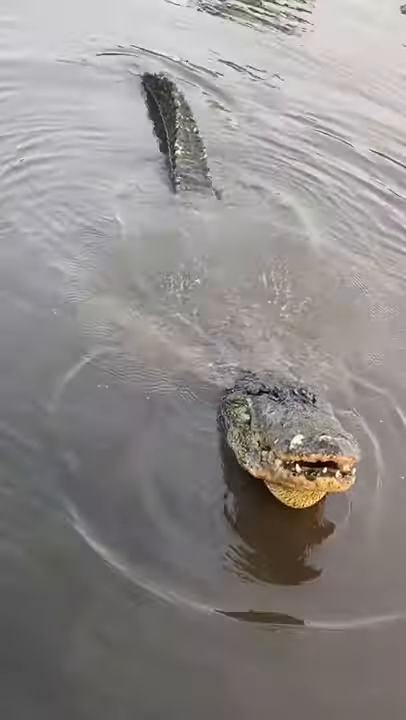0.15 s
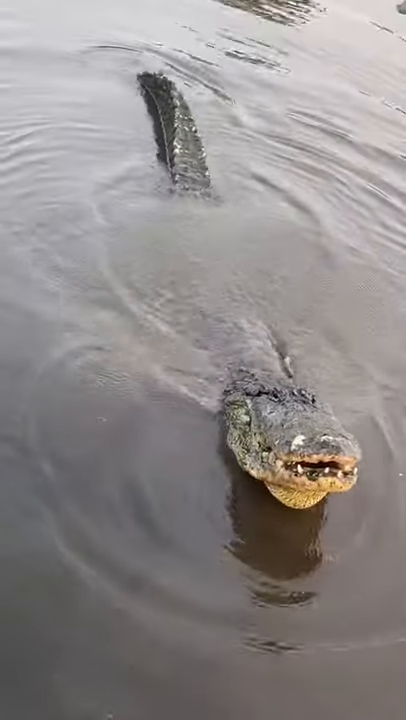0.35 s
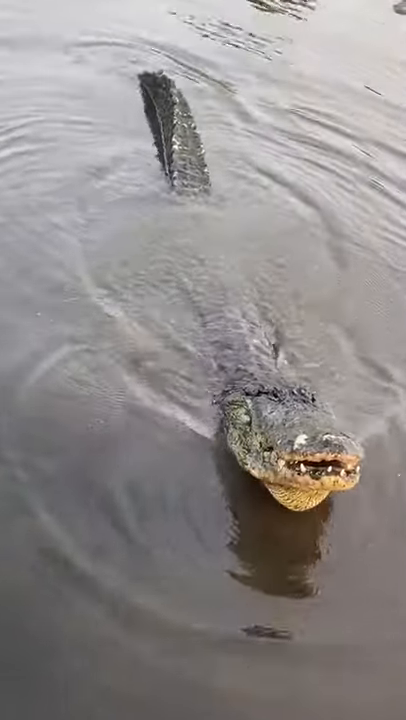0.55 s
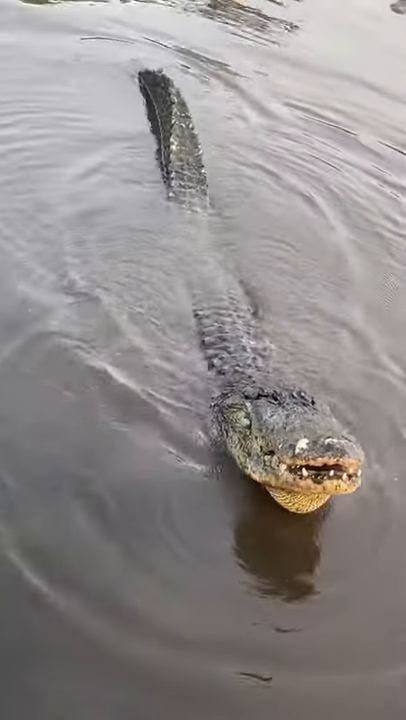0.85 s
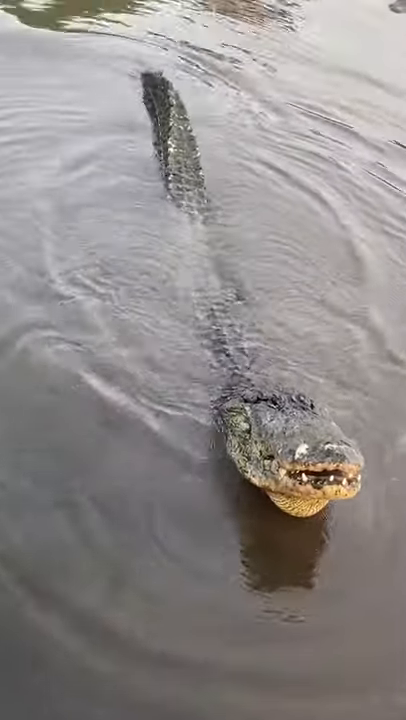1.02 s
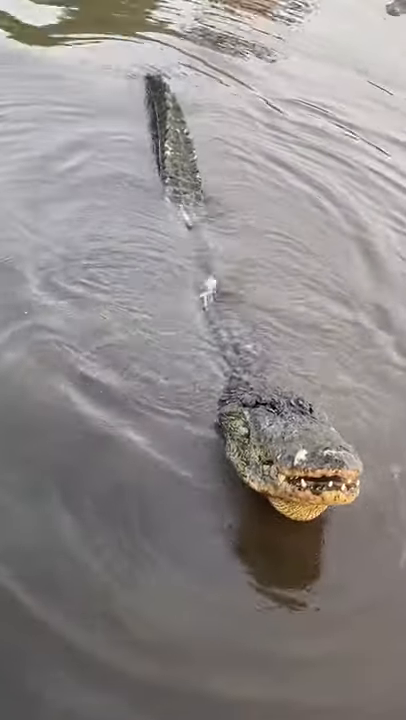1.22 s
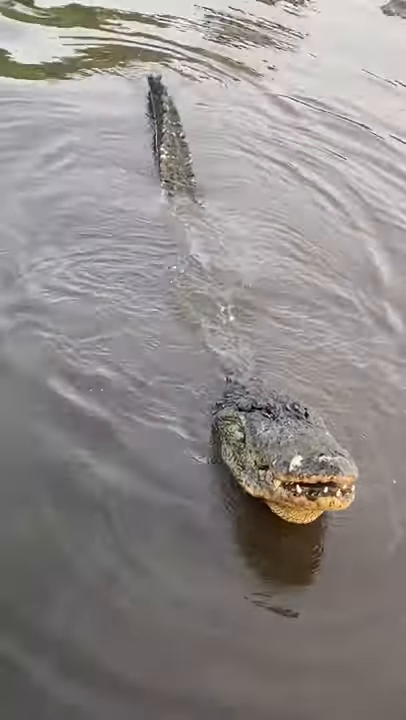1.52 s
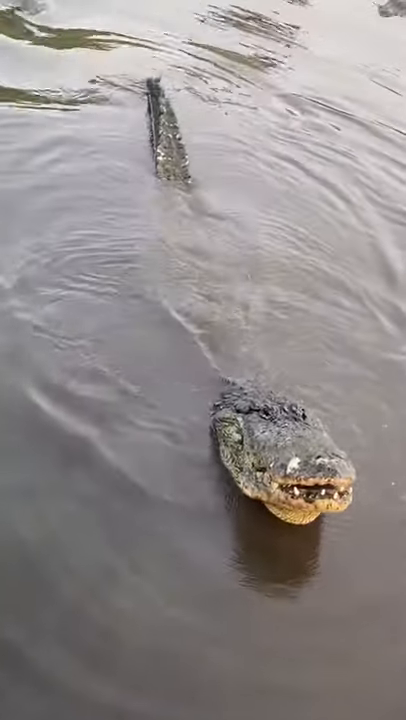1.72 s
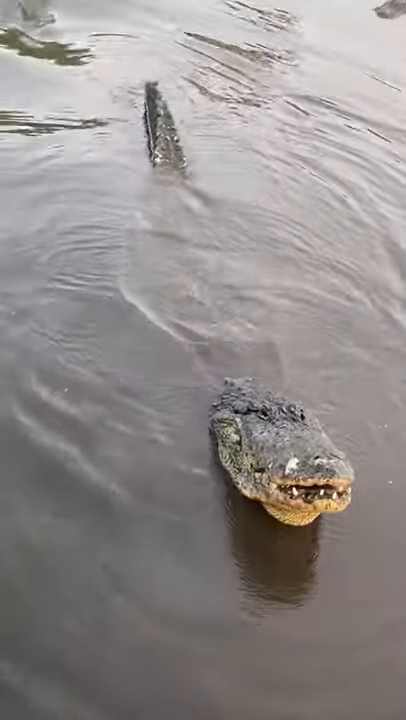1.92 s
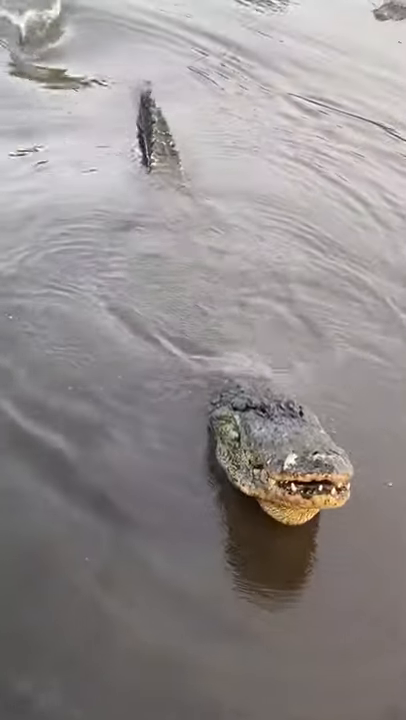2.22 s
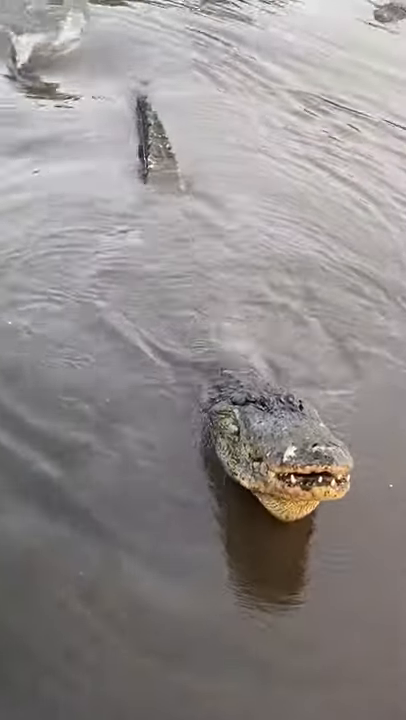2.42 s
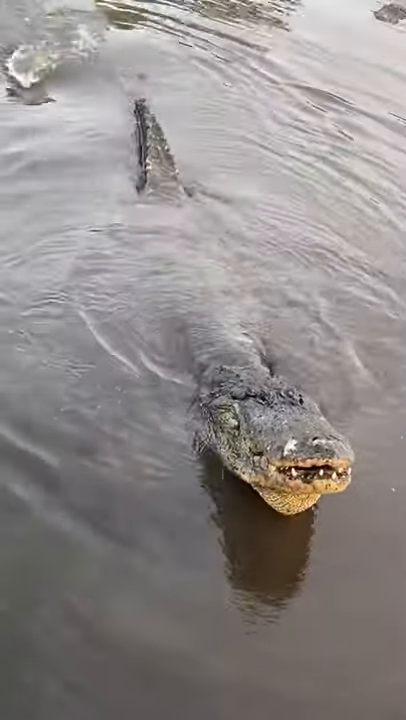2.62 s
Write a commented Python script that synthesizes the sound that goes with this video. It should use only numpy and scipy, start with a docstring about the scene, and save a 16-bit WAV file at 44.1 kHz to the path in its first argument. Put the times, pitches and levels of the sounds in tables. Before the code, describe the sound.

An alligator bellows close by, a deep throbbing growl with wet rasp, ending in separate grunts

```python
"""Alligator bellow in a pond

A bellow close by: two vocal folds flap at different rates and beat in a throb that first quickens, then slows.
The flaps ring chest, body and throat and chop a wet rasp of bubbles and hiss. Separate grunts, each a decaying
ring and a puff, open and close the bellow, and one falls within it; spurts and gurgles wet it, and soft sine
hums and a tremor sit below. Behind lie a faint centred echo from the banks, with fainter opposite-sign noise
tails left and right, a low outdoor rumble and the fine hiss of disturbed water.
"""
import sys
import numpy as np
from scipy import signal
from scipy.fft import rfft, irfft
from scipy.io import wavfile
from scipy.ndimage import uniform_filter1d, minimum_filter1d

SR = 44100
rng = np.random.default_rng(int(sys.argv[2]) if len(sys.argv) > 2 else 0)


def file_out(sig):
    """Save sig as 16-bit WAV at sys.argv[1]."""
    # one column per channel
    cols = np.atleast_2d(sig).T
    # limit, then scale
    lim = np.clip(cols, -1, 1)
    pcm = np.round(lim * 32767).astype(np.int16)
    wavfile.write(sys.argv[1], SR, pcm)


N = 121275
T = np.arange(N) / SR

# Fold motion: (time [s], rate of the slow fold [Hz], throb rate [Hz]); the fast fold runs at their sum
FOLDS = [(0.27, 55.99, 16.77), (0.42, 55.01, 17.75), (0.58, 55.65, 21.06), (0.74, 54.08, 20.12),
         (0.9, 53.56, 17.43), (1.1, 51.71, 16.63), (1.3, 49.15, 15.62), (1.5, 47.81, 16.11),
         (1.66, 47.4, 15.82)]
# Layers of the bellow: (time [s], chest [dB], body [dB], upper body [dB], throat [dB], rasp [dB])
LEVELS = [(.3, -12.5, -14, -23.5, -32, -33.5), (.42, -11, -10.5, -10, -21, -23.5),
          (.6, -11, -11, -19, -27.5, -24), (.85, -10, -7.5, -14.5, -22.5, -24),
          (1.1, -11.5, -11.5, -14, -28, -27), (1.3, -11, -11, -21.5, -26, -26.5),
          (1.46, -9.5, -7, -22.5, -31.5, -29), (1.52, -17, -7, -36, -20.5, -29),
          (1.548, -25, -23, -14, -33, -31.5), (1.58, -18, -5.5, -21.5, -27, -27),
          (1.64, -18, -21, -36, -34.5, -33.5)]
# Posture: (time [s], body resonance [Hz], first throat resonance [Hz], share of the fast fold [0-1])
POSTURE = [(.3, 118, 789.5, 0.1), (.65, 104, 794, 0.54), (.92, 107, 797, 0.05), (1.1, 130.5, 813, 0.95),
           (1.35, 121, 843, 0.53), (1.52, 135, 864, 0.45), (1.75, 129, 822, 0.7)]
# Exponent that narrows the throb: (at the start [1], at the end [1])
THROB_SHARPNESS = [1.1, 7.1]
# Upper body resonances: (frequency [Hz], width of one filter stage [Hz], balance [dB])
UPPER_BODY = [(253.1, 74, 3.5), (302.8, 68, 0), (335.6, 26, -2.5)]
# Throat resonances before posture and waver: (frequency [Hz], width of one filter stage [Hz], balance [dB])
THROAT = [(815, 37, 8), (855, 77, -2.5), (971, 110, -9.5), (1198, 38.7, 2), (1498, 132, -10),
          (1649, 35, -13.5)]
# Relative colour of the rasp: (frequency [Hz], spectrum level [dB per Hz])
RASP_COLOUR = [(1000, -39), (1600, 6), (1750, -18), (1880, 3.5), (2060, -3), (2320, 2), (3560, 0.5),
               (3970, 2.5), (4980, -4), (5820, -5), (6730, -12.5), (9010, -9), (12600, -23), (13700, -45)]
# Grunts, levels before GRUNT_TRIM: (time [s], body [Hz], upper body [Hz],
# chest [dB], body [dB], upper body [dB], throat [dB], rasp [dB])
GRUNTS = [(0.187, 123, 323, -38, -31, -23.5, -32, -42), (0.211, 123, 284, -33, -18.5, -8, -28, -30),
          (0.237, 109, 276, -23, -8, -5.5, -14.5, -22), (0.262, 155, 280, -18, -12, -5, -12, -25.5),
          (0.277, 144, 294.6, -24, -9.5, -3.5, -21, -30), (0.321, 126.4, 360, -37, -4.5, -10, -12.5, -15),
          (0.553, 158, 266.6, -18, -11, -4.5, -21.5, -43), (1.664, 134, 330, -25, -6, -12, -17.5, -27),
          (1.679, 170.4, 290, -17, -8.5, -23, -21, -27), (1.704, 159, 295, -9, -9, -29, -24.5, -26.5),
          (1.73, 148, 245, -27, -18, -10.5, -27, -28.5), (1.795, 157, 322, -2, -6.5, -16, -23, -28),
          (1.815, 165, 266.5, -10, -20, -9.5, -20.5, -29.5), (1.89, 136, 265, -12, -5.5, -23.5, -29, -29.5),
          (1.909, 172, 273, -16, -11.5, -10.5, -25, -38), (1.946, 147, 278, -12, -21, -41, -38, -34),
          (1.983, 130, 338, -10, -8.5, -18, -34, -28), (2.005, 170, 266, -30, -8.5, -26, -26.5, -35),
          (2.044, 162, 271, -26, -32, -8.5, -33.5, -36.5), (2.085, 139, 337, 1, -10, -23, -33, -34),
          (2.114, 165.5, 250, -33, -10.5, -11, -30.5, -36.5), (2.148, 161, 256, -31, -36, -14.5, -36, -38),
          (2.195, 132, 316, -1, -13, -14.5, -40, -35.5), (2.227, 190, 230, -31, -15.5, -23, -35, -38.5),
          (2.272, 144, 287, 0.5, -12.5, -20, -35, -36), (2.312, 132.3, 256, -20, -16, -18, -46, -35),
          (2.359, 180, 277, -17, -12.5, -22, -33, -34.5), (2.402, 183, 255, -6, -18, -23.5, -37, -36.5),
          (2.444, 149, 297, -10.5, -21.5, -28.5, -37, -40)]
# Level added to every grunt: (chest [dB], body [dB], upper body [dB], throat [dB], rasp [dB])
GRUNT_TRIM = [-6.5, 5.5, 1, -0.5, 3]
# Wet spurts at the mouth: (time [s], level [dB])
SPURTS = [(.109, -49.5), (0.167, -41), (0.32, -21), (0.493, -20.5), (0.646, -24.5), (0.741, -15),
          (1.136, -23.5), (1.377, -21.5), (1.44, -22), (1.659, -27)]
# Gurgles in the throat: (time [s], centre pitch [Hz], level [dB])
GURGLES = [(0.168, 812, -31), (.26, 1590, -20.5), (0.284, 1540, -23), (.32, 1510, -16), (.319, 1910, -21.5),
           (.318, 2206, -23.5), (0.34, 778, -19), (1.441, 899, -18), (1.458, 1225, -19.5),
           (1.657, 898, -19), (1.818, 1200, -34), (2.192, 4270, -30)]
# Gliding hums of the body: (start [s], end [s], start pitch [Hz], end pitch [Hz], level [dB])
HUMS = [(1.221, 1.52, 364.8, 205.9, -29), (1.598, 2.095, 82.1, 63.7, -22), (2.193, 2.509, 80, 41.1, -22.5),
        (2.444, 2.558, 147.5, 200, -25), (2.722, 2.805, 94.7, 92, -37)]
# Relative colour of the outdoor wash: (frequency [Hz], spectrum level [dB per Hz])
WASH_COLOUR = [(15, -45), (25, -15), (75, 20), (278, -10.5), (488, -11), (558, -17.5), (978, -11.5),
               (1090, -15), (1760, -18.5), (2500, -21.5), (6370, -28), (11200, -37), (15000, -60)]
# Gain of the hiss of the stirred water: (time [s], gain [dB])
STIRRED = [(0, -3), (.15, -3.5), (.3, 16), (2.5, 7), (2.75, 5.5)]

# Bellow and its flaps
START_S, END_S, FADE_S = 0.27, 1.65, 0.052
THROB_DEPTH, FLAP_SPREAD_DB, FLAP_JITTER_S = 0.89, 2.2, 0.00023
CHEST_HZ, CHEST_WIDTH_HZ, BODY_WIDTH_HZ, BASS_CUT_HZ = 61.7, 55, 68, 16
UPPER_ROUGH, UPPER_TOP_HZ = 0.55, 405  # gain of puffed air in the upper body, and its low-pass
PUFF_S, PUFF_RISE_S, PUFF_BASE = 0.013, 0.0056, 0.8  # decay, rise, constant airflow under the puffs
# Throat
THROAT_CLICK, THROAT_LOW_HZ = 0.89, 720  # gain of the bare flaps, and the high-pass
THROAT_WAVER, THROAT_GROWTH_DB_PER_S = 0.024, 7  # waver is an rms share of the pitch
# Rasp
RASP_LOW_HZ, RASP_SIDE_LOW_HZ, RASP_SIDE_DB, RASP_LEAD_S = 1610, 3900, -11, 0.0081
PATCH_DB, PATCH_HZ, PATCH_S = 3, 250, 0.024  # patch strength, and its extent in pitch and time
PATCH_FRAME, PATCH_HOP = 256, 128  # samples
BUBBLE_S, SMOOTH_HISS = 0.0017, 1.2  # decay constant of a bubble, gain of the hiss under the bubbles
# Grunts
GRUNT_RISE_S, BODY_RISE_S, CHEST_RISE_S, GRUNT_PUFF_S = 0.0064, 0.0064, 0.0066, 0.0066
GRUNT_CHEST_HZ, GRUNT_TAIL, GRUNT_TAIL_S = 60, 0.3, 0.023
OVERTONE_HZ, OVERTONE_WIDTH_HZ, OVERTONE_DB = 351.2, 29.6, -21
# Spurts, gurgles and body movement
PUFF_LEAD_S = 0.002  # air of grunts and spurts starts this much before the table time
SPURT_RISE_S, SPURT_THROAT = 0.0038, 1
GURGLE_RISE_S, GURGLE_WAVER_HZ = 0.0055, 45.9
HUM_FADE_S = 0.036
TREMOR_HZ, TREMOR_DB, TREMOR_END_S, TREMOR_FADE_S = 46.8, -21, 0.25, 0.097
# Pond and output
WASH_DB, RUMBLE_DB, RUMBLE_TOP_HZ, PATTER_DB = -31.5, -3.5, 180, 2.55  # WASH_DB is before the split
ECHO_DB, ECHO_LOW_HZ, SIDE_TAIL_DB, SIDE_TAIL_LOW_HZ = -6.5, 140, -26.5, 507
ECHO_T60_S, ECHO_DELAY_S = 0.42, 0.012
BASS_ROLLOFF_HZ, LIMIT_S, EDGE_HZ = 46.4, 0.0022, 13200


def bellow():
    """The sustained voice: flaps ring chest and body, and release puffs of air into throat and rasp."""
    pulses = flaps()
    fade_in = np.clip((T - START_S) / FADE_S, 0, 1)
    fade_out = np.clip((END_S + FADE_S - T) / FADE_S, 0, 1)
    gate = fade_in * fade_out
    chest_g, body_g, upper_g, throat_g, rasp_g = (gate * amp(curve(LEVELS, column=k)) for k in range(1, 6))

    puff = (1 - np.exp(-T / PUFF_RISE_S)) * np.exp(-T / PUFF_S)
    puffs = steady(signal.fftconvolve(pulses, puff)[:N]) + PUFF_BASE
    air = unit(puffs * rng.standard_normal(N))

    chest = cut(resonate(pulses, CHEST_HZ, CHEST_WIDTH_HZ), BASS_CUT_HZ, "highpass")
    body = cut(resonate(pulses, curve(POSTURE, column=1), BODY_WIDTH_HZ), CHEST_HZ, "highpass")
    rough = unit(pulses) + UPPER_ROUGH * air
    upper = sum(amp(db) * resonate(rough, hz, width) for hz, width, db in UPPER_BODY)
    upper = cut(upper, UPPER_TOP_HZ, "lowpass")
    voice = throat(THROAT_CLICK * unit(pulses) + air)

    tone = chest_g * steady(chest) + body_g * steady(body)
    tone = tone + upper_g * steady(upper) + throat_g * steady(voice)
    early_puffs = np.interp(T + RASP_LEAD_S, T, puffs)
    return tone + rasp(rasp_g * steady(early_puffs))


def flaps():
    """Pulses of two beating folds, strongest when they close together, uneven in time and strength."""
    running = T >= START_S
    slow = np.cumsum(curve(FOLDS, column=1) * running) / SR
    throb = np.cumsum(curve(FOLDS, column=2) * running) / SR
    sharpness = np.interp(T, [START_S, END_S], THROB_SHARPNESS)
    accent = 1 - THROB_DEPTH + THROB_DEPTH * abs(np.cos(np.pi * throb)) ** sharpness
    fast_share = np.clip(curve(POSTURE, column=3), 0, 1)
    out = np.zeros(N)
    for turns, share in ((slow, 1 - fast_share), (slow + throb, fast_share)):
        at = np.flatnonzero(np.diff(np.floor(turns)))  # one flap per full turn
        at = at[T[at] < END_S]
        late, size = rng.standard_normal((N // 100, 2))[:len(at)].T
        shift = (late * FLAP_JITTER_S * SR).astype(int)
        out[at + shift] += share[at] * accent[at] * amp(FLAP_SPREAD_DB * size)
    return out


def throat(drive):
    """Narrow wavering air resonances; the lower two follow the posture, the fourth grows with time."""
    lift = curve(POSTURE, column=2) / THROAT[0][0]
    drift = uniform_filter1d(uniform_filter1d(rng.standard_normal(N), size=1100), size=700)
    waver = 1 + THROAT_WAVER * unit(drift)
    rings = np.zeros(N)
    for k, (hz, width, db) in enumerate(THROAT):
        pitch = hz * waver * (lift if k < 2 else 1)
        growth = THROAT_GROWTH_DB_PER_S * (T - 1.5) if k == 3 else 0
        rings += amp(db + growth) * resonate(drive, pitch, width)
    return cut(rings, THROAT_LOW_HZ, "highpass")


def rasp(envelope):
    """Bubbles and wet hiss, patchy in time and pitch, with side noise that differs in each ear."""
    mid = unit(shaped(bubbles() + SMOOTH_HISS * rng.standard_normal(N), RASP_COLOUR, RASP_LOW_HZ))
    side = unit(shaped(rng.standard_normal(N), RASP_COLOUR, RASP_SIDE_LOW_HZ))
    stereo = mid + np.array([[1], [-1]]) * amp(RASP_SIDE_DB) * side
    z = signal.stft(stereo, nperseg=PATCH_FRAME)[2]
    # one random gain map for both ears, smoothed along pitch, then time
    field = rng.standard_normal(z.shape[1:])
    for axis, step in ((0, SR / PATCH_FRAME / PATCH_HZ), (1, PATCH_HOP / SR / PATCH_S)):
        field = signal.lfilter([1], [1, -np.exp(-step)], field, axis=axis)
    patches = amp(PATCH_DB * 2 * np.tanh(unit(field) / 2))  # soft limit at twice PATCH_DB
    return envelope * unit(signal.istft(z * patches)[1][:, :N])


def bubbles():
    """Dense fizz of tiny bursting bubbles, each a very short ring at a random pitch."""
    t = np.arange(600) / SR
    out = np.zeros(N + len(t))
    ring = t * np.exp(-t / BUBBLE_S)
    for when, pitch, size in rng.random((6000, 3)):
        hz = 1100 + 12000 * pitch
        out[int(when * N):][:len(t)] += size * ring * np.sin(2 * np.pi * hz * t)
    return unit(out[:N])


def grunts():
    """Single slaps of the folds: each rings chest and body and puffs air through the throat."""
    ring, voiced, hissed, stirred = np.zeros((4, N))
    for s, body_hz, upper_hz, *levels in GRUNTS:
        chest_g, body_g, upper_g, throat_g, rasp_g = amp(np.add(levels, GRUNT_TRIM))
        partials = ((GRUNT_CHEST_HZ, chest_g, CHEST_RISE_S),
                    (body_hz, body_g, BODY_RISE_S),
                    (upper_hz, upper_g, GRUNT_RISE_S))
        for hz, gain, rise_s in partials:
            ring += np.sqrt(2) * gain * swell(s, rise_s) * np.sin(2 * np.pi * hz * (T - s))
        stirred += body_g * swell(s, BODY_RISE_S)
        voiced += throat_g * swell(s, GRUNT_RISE_S)
        hissed += rasp_g * swell(s - PUFF_LEAD_S, GRUNT_PUFF_S)
    # the grunts also stir the top body resonance
    overtone = unit(resonate(rng.standard_normal(N), OVERTONE_HZ, OVERTONE_WIDTH_HZ, order=3))
    ring += amp(OVERTONE_DB) * stirred * overtone
    return ring + voiced * unit(throat(rng.standard_normal(N))) + rasp(hissed)


def spurts():
    """Short wet bursts of air that also ring the throat."""
    envelope = sum(amp(db) * swell(s - PUFF_LEAD_S, SPURT_RISE_S) for s, db in SPURTS)
    return rasp(envelope) + SPURT_THROAT * envelope * unit(throat(rng.standard_normal(N)))


def gurgles():
    """Larger pockets of air that ring in the wet throat, each with an unsteady pitch."""
    out = np.zeros(N)
    for s, hz, db in GURGLES:
        waver = GURGLE_WAVER_HZ * unit(uniform_filter1d(rng.standard_normal(N), size=120))
        out += amp(db) * swell(s, GURGLE_RISE_S) * np.sin(2 * np.pi * np.cumsum(hz + waver) / SR)
    return np.sqrt(2) * out


def hums():
    """Soft gliding sine tones of the trembling body."""
    out = np.zeros(N)
    for start, end, from_hz, to_hz, db in HUMS:
        turns = np.cumsum(np.interp(T, [start, end], [from_hz, to_hz])) / SR
        fade = np.clip(np.minimum(T - start, end - T) / HUM_FADE_S, 0, 1)
        out += np.sqrt(2) * amp(db) * fade * np.sin(2 * np.pi * turns)
    return out


def tremor():
    """The body already shudders in the water before the sustained voice sets in: a low sine that fades."""
    fade = np.clip((TREMOR_END_S - T) / TREMOR_FADE_S, 0, 1)
    return np.sqrt(2) * amp(TREMOR_DB) * fade * np.sin(2 * np.pi * TREMOR_HZ * T)


def echo(animal):
    """A faint centred echo from the banks, with fainter opposite-sign noise tails left and right."""
    tails = rng.standard_normal((2, N)) * amp(-60 * T / ECHO_T60_S) * (T > ECHO_DELAY_S)
    mono = animal.mean(0)
    centre, side = (signal.fftconvolve(mono, tail / np.linalg.norm(tail))[:N] for tail in tails)
    centre = amp(ECHO_DB) * cut(centre, ECHO_LOW_HZ, "highpass")
    side = amp(SIDE_TAIL_DB) * cut(side, SIDE_TAIL_LOW_HZ, "highpass")
    return centre + np.array([[1], [-1]]) * side


def wash():
    """Coloured noise split into low outdoor rumble and the pattering hiss of disturbed water."""
    air = amp(WASH_DB) * unit(shaped(rng.standard_normal(N), WASH_COLOUR, 30))
    rumble = signal.sosfiltfilt(signal.butter(2, RUMBLE_TOP_HZ, fs=SR, output="sos"), air)
    flicker = unit(uniform_filter1d(rng.standard_normal(N), size=150))
    patter = unit(amp(PATTER_DB * flicker))
    return amp(RUMBLE_DB) * rumble + (air - rumble) * patter * amp(curve(STIRRED, column=1))


def amp(db):
    """Decibels to gain."""
    return 10 ** (np.asarray(db) / 20)


def unit(x):
    """Scales to rms 1."""
    return x / np.sqrt(np.mean(x ** 2) + 1e-20)


def curve(table, column):
    """One column of a table, joined by straight lines in time."""
    table = np.array(table)
    return np.interp(T, table[:, 0], table[:, column])


def shaped(x, points, low_hz):
    """Colours x by a spectrum and cuts the bass below low_hz."""
    hz = np.fft.rfftfreq(N, 1 / SR) + 1  # the offset avoids log(0)
    f, db = np.transpose(points)
    colour = amp(np.interp(np.log(hz), np.log(f + 1), db))
    bass_cut = np.sqrt(1 + (low_hz / hz) ** 10)
    return irfft(rfft(x) * colour / bass_cut, N)


def resonate(x, hz, width, order=2):
    """A resonance of gain 1 that can follow a pitch curve: shift to 0 Hz, smooth, shift back."""
    turn = np.exp(2j * np.pi * np.cumsum(hz * np.ones(N)) / SR)
    r = np.exp(-np.pi * width / SR)
    z = x / turn + 1e-18
    for _ in range(order):
        z = signal.lfilter([1 - r], [1, -r], z)
    return 2 * (turn * z).real


def steady(x):
    """Evens out the slow level of x and keeps its throb."""
    power = abs(uniform_filter1d(uniform_filter1d(x ** 2, size=7000), size=5000))
    return x / np.sqrt(power + power.max() / 20)


def swell(s, rise_s):
    """Envelope of a slap or burst: swells to about 1, dies quickly and leaves a short tail."""
    age = np.maximum(T - s, 0)
    u = age / rise_s
    hump = (u * np.exp(1 - u)) ** 2
    tail = np.tanh(u) * np.exp(-age / GRUNT_TAIL_S)
    return (1 - GRUNT_TAIL) * hump + GRUNT_TAIL * tail


def cut(x, hz, kind):
    """Steep high-pass or low-pass without delay."""
    return signal.sosfiltfilt(signal.butter(4, hz, kind, fs=SR, output="sos"), x)


def scene():
    """The animal, its echo, the shudder of its body and the pond."""
    animal = bellow() + grunts() + spurts() + gurgles()
    return animal + echo(animal) + hums() + tremor() + wash()


def record(dry):
    """Bass roll-off, a fast peak limiter, then a steep treble limit."""
    x = cut(dry, BASS_ROLLOFF_HZ, "highpass")
    size = int(LIMIT_S * SR)
    gain = np.minimum(1, 1 / (abs(x).max(0) + 1e-9))  # shared by both ears
    x = x * uniform_filter1d(minimum_filter1d(gain, size), size)
    lowpass = signal.firwin(511, EDGE_HZ, window=("kaiser", 9), fs=SR)
    return signal.oaconvolve(x, lowpass[None], "same")


dry = scene()
out = record(dry)
file_out(out)
```